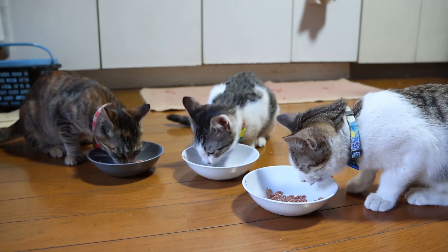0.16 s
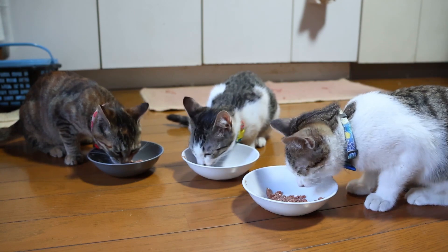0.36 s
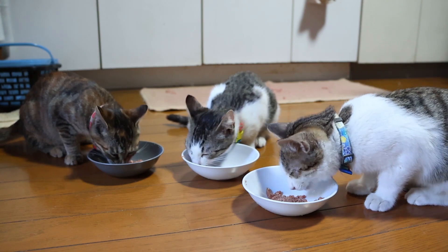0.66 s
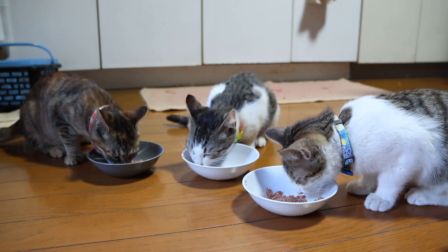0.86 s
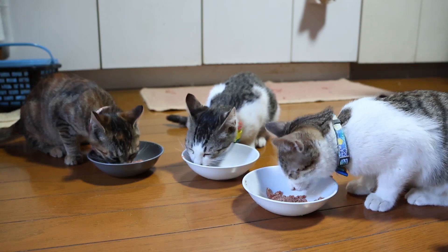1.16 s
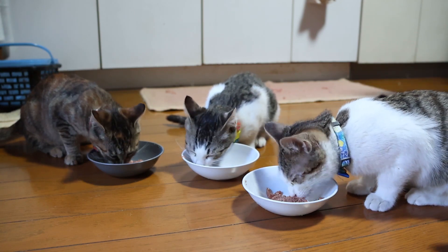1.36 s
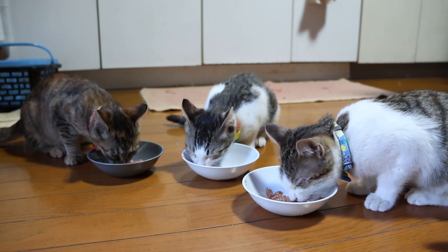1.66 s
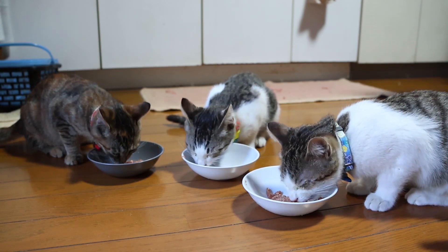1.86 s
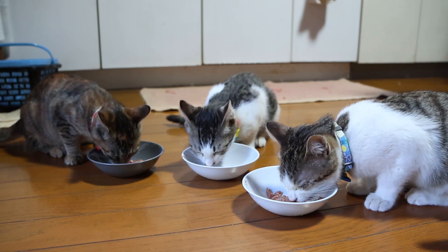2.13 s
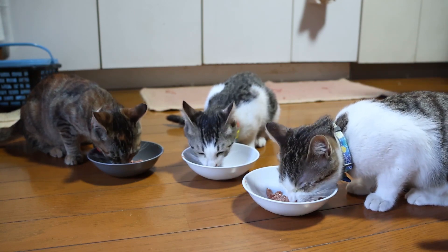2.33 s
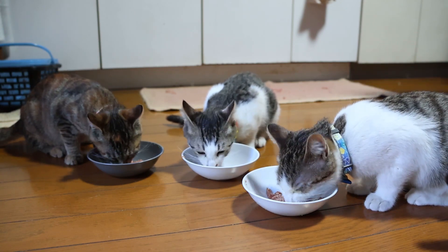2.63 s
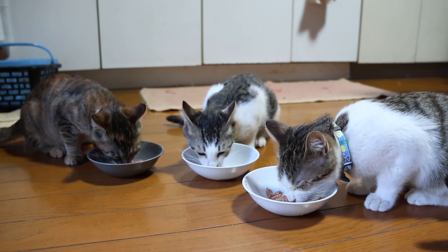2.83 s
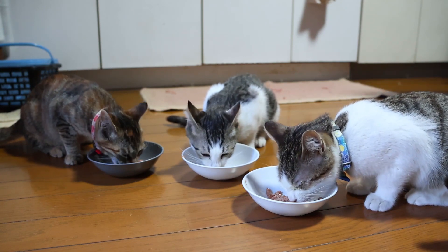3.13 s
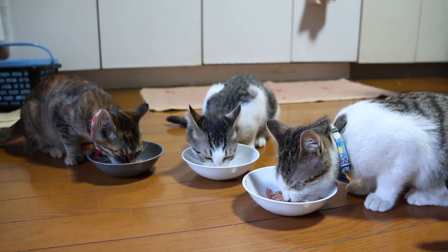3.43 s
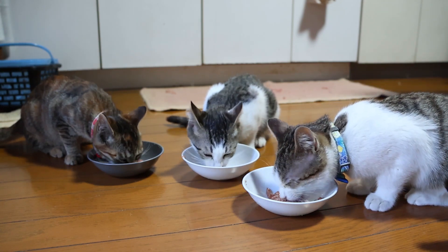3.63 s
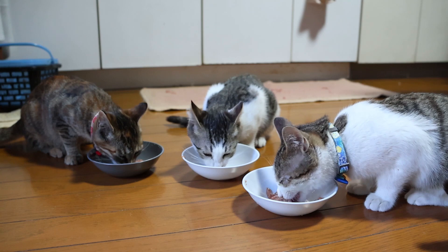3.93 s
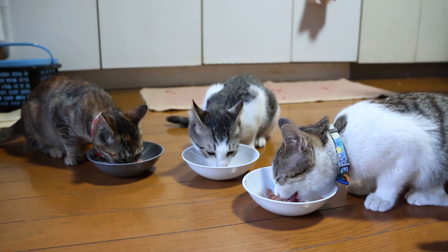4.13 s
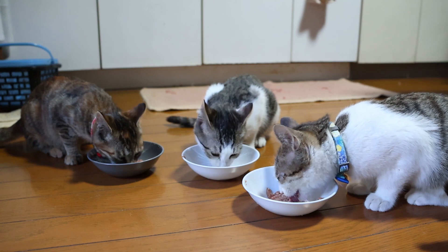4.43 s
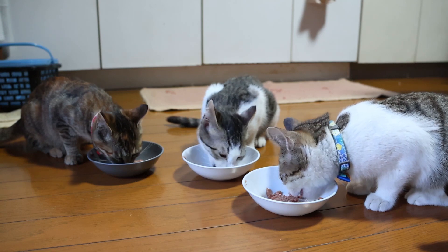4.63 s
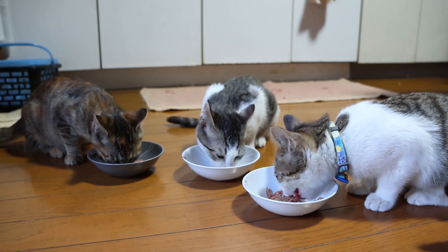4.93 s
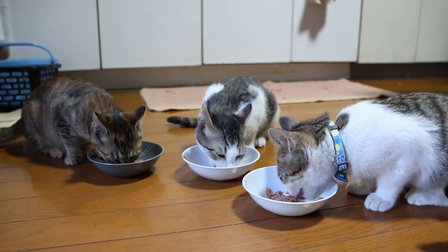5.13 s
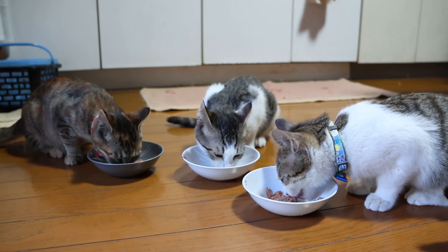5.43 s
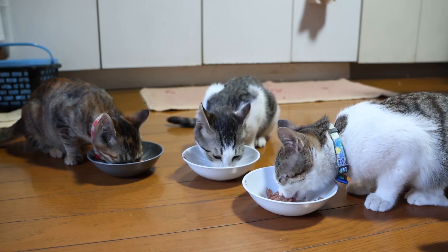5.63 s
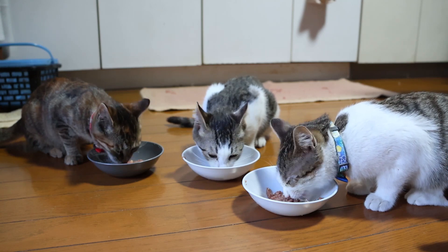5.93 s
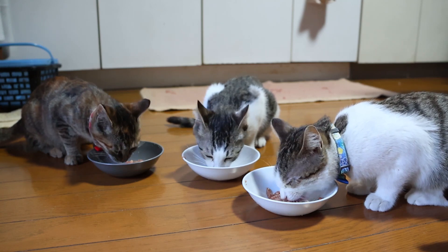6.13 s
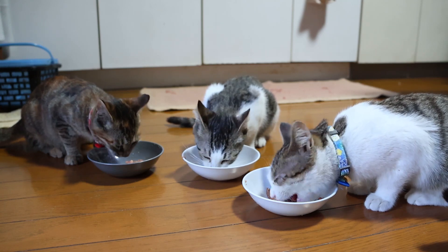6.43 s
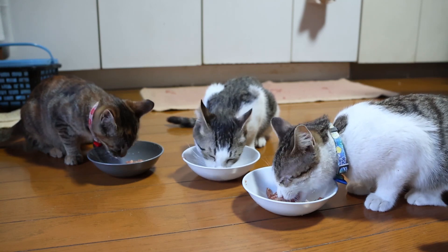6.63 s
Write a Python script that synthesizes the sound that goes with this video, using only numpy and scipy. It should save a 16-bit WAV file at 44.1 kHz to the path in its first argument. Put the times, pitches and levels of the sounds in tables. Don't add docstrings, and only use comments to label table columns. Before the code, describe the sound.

Three kittens lap and smack wet food from bowls in a small quiet kitchen, busy sticky clicks over a faint low motor hum.

```python
import sys
import numpy as np
from scipy import signal
from scipy.fft import rfft, irfft
from scipy.io import wavfile
from scipy.ndimage import uniform_filter1d

SR = 44100
rng = np.random.default_rng(int(sys.argv[2]) if len(sys.argv) > 2 else 0)


def undo_db(level):
    steps = np.asarray(level, float) / 20
    return 10 ** steps


def persist_wave(psi):
    counts = np.round(np.clip(psi, -1, 1) * 32767).astype(np.int16)
    wavfile.write(sys.argv[1], SR, np.atleast_2d(counts).T)


N = 299439

# t/s, level/dB, f/Hz
GULPS = [(.1666, -44, 1090), (.2195, -43, 1260), (1.0153, -44.5, 1240), (1.1931, -43.5, 1060),
         (1.2878, -47, 850), (1.4604, -46.5, 1260), (1.7356, -49.5, 990), (1.8044, -46, 800),
         (1.9877, -40.5, 1090), (2.1564, -46, 874), (2.326, -34, 1210), (2.5679, -43.5, 1080),
         (3.1939, -49.5, 1100), (3.2729, -46, 910), (3.491, -42, 1060), (4.1449, -50, 930),
         (4.1907, -39, 1023), (4.5297, -39.5, 874), (4.8328, -44.5, 930), (4.8744, -47, 930),
         (6.02, -48, 1200), (6.0995, -46.5, 1090), (6.2041, -45.5, 995), (6.3054, -49, 800),
         (6.413, -40.5, 1270)]
# t/s, level/dB, f/Hz
SLURPS = [(.005, -30, 1636), (.1002, -46, 1560), (.193, -36.5, 1510), (.844, -39.5, 1690),
          (1.7288, -46, 1780), (1.8807, -42.5, 1550), (2.2556, -44, 1640), (2.3895, -46, 1690),
          (2.8369, -41, 1490), (3.6854, -43.5, 1700), (4.1398, -34.5, 1820), (4.395, -36.5, 1730),
          (4.7889, -43, 1550), (4.8786, -46.5, 1430), (4.9216, -40, 1600), (5.1425, -41, 1490),
          (5.1755, -42, 1660), (5.3563, -45, 1780), (5.3845, -35, 1800), (5.5193, -38, 1460),
          (5.612, -42, 1530), (5.7404, -40, 1460), (6.1525, -42.5, 1510), (6.1837, -39.5, 1730),
          (6.3867, -43, 1520), (6.5862, -45.5, 1520)]
# t/s, level/dB, f/Hz
SLAPS = [(.3824, -33, 1480), (.5739, -23.5, 1640), (.5745, -43, 1830), (.495, -39, 1580),
         (1.148, -27.5, 1620), (1.5068, -43, 1530), (1.6078, -28.5, 1670), (1.6988, -43, 1540),
         (1.948, -42, 1730), (2.0932, -38, 1590), (2.335, -24.5, 1366), (3.283, -35.5, 1640),
         (3.4198, -32, 1350), (3.5271, -36.5, 1940), (3.6593, -43, 1610), (4.0578, -46, 1490),
         (4.2884, -32.5, 1860), (4.3388, -23.5, 1680), (4.59, -36, 1580), (4.9975, -26.5, 1580),
         (5.1034, -42, 1600), (5.2477, -42, 1360), (5.5016, -32, 1640), (5.6505, -35.5, 1770),
         (5.9832, -38, 1440), (6.4288, -33.5, 1530), (6.4765, -40.5, 1350), (6.477, -50, 645),
         (6.7823, -39, 850), (6.7823, -26.5, 1910)]
# t/s, level/dB, f/Hz
CLACKS = [(.001, -36, 2400), (.1885, -34, 2500), (.328, -59, 2660), (.8458, -35, 2470),
          (.9629, -39.5, 2080), (1.0128, -39.5, 2720), (1.3738, -44, 2520), (1.4015, -45, 2100),
          (1.6666, -30, 2320), (1.6988, -43, 3070), (2.0986, -51, 2870), (2.2833, -39, 2600),
          (2.4476, -47, 3350), (2.7476, -42.5, 3400), (3.9029, -39, 2170), (4.346, -32.5, 2560),
          (4.5929, -38, 2340), (4.8066, -48.5, 2800), (1.8688, -47, 4050), (6.4624, -46, 2580),
          (6.5052, -43, 2670), (6.616, -37.5, 3280), (6.7141, -32, 2360)]
# t/s, level/dB, f/Hz
CLUCKS = [(1.1505, -27.5, 2370), (1.9932, -36, 2160), (2.0555, -33, 2830), (2.1772, -35, 2100),
          (2.5835, -35, 2650), (2.6156, -29.5, 2270), (2.6783, -44, 3460), (2.8478, -25.5, 2670),
          (3.0486, -41, 2980), (3.4241, -36.5, 2970), (3.7396, -44.5, 3400), (3.7889, -43.5, 2260),
          (4.3999, -31.5, 2630), (4.4634, -40, 2530), (4.5086, -28.5, 2500), (5.1086, -34.5, 2640),
          (5.2057, -42, 2540), (5.234, -41.5, 2980), (5.3435, -37, 2780), (5.7724, -40.5, 2700),
          (5.9927, -32.5, 2750), (6.192, -36.5, 2740), (6.2646, -39.5, 2590)]
# t/s, level/dB, f/Hz
SMACKS = [(.2893, -45, 6680), (.3273, -53.5, 4620), (.8852, -47, 4660), (1.0125, -50.5, 6500),
          (1.176, -35.5, 5830), (1.2479, -50, 6350), (1.5339, -51, 6200), (1.7361, -54, 5100),
          (1.7625, -46, 5490), (1.983, -47, 8150), (2.0316, -42, 8060), (2.373, -56, 5370),
          (2.5849, -38.5, 6430), (3.3887, -54, 8000), (3.4248, -45, 5920), (3.4652, -43.5, 7300),
          (3.098, -56, 7100), (3.555, -65, 6200), (4.9632, -55.5, 11900), (4.1148, -35.5, 5020),
          (4.1154, -33.5, 7530), (4.2296, -48.5, 6900), (4.2977, -47.5, 5180), (5.2708, -48.5, 6530),
          (5.4753, -56, 4100), (5.5585, -41, 5020), (5.9599, -52.5, 4400), (6.5231, -53, 4170),
          (6.7755, -51, 4970)]
# t/s, level/dB, f/Hz
TICKS = [(.546, -40.5, 7250), (.566, -46, 6700), (.9282, -42, 4300), (1.655, -45, 4240),
         (2.1239, -35, 6680), (2.4372, -50.5, 5300), (2.7472, -49.5, 7590), (2.845, -40.5, 4350),
         (2.8872, -44, 6500), (3.3382, -48.5, 6470), (3.6194, -37, 7100), (3.7748, -49, 3740),
         (3.8911, -43.5, 4700), (4.0164, -49, 5420), (4.0697, -40, 7100), (4.4585, -42, 6660),
         (4.4968, -42, 8300), (4.5642, -32.5, 6740), (4.9228, -49, 6100), (5.2227, -48, 7600),
         (5.2539, -44, 7840), (5.6502, -47, 5400), (5.8183, -40.5, 7800), (6.0186, -45, 7240),
         (6.0861, -39.5, 4200), (6.0877, -41.5, 7750), (6.3334, -46.5, 7260), (6.6156, -40.5, 6400),
         (6.6779, -45, 5850), (6.733, -35.5, 5560)]
# t/s, level/dB, f/Hz
SNAPS = [(.0587, -32, 10200), (.288, -40.5, 10400), (.4908, -43, 9570), (.92, -35, 14200),
         (1.0689, -46, 10420), (1.868, -26, 10500), (2.3986, -40, 14140), (2.6626, -40.5, 9000),
         (2.836, -38.5, 8900), (2.847, -38, 9300), (3.3362, -40, 14340), (3.889, -39, 9400),
         (4.1047, -32, 14400), (4.419, -34, 14060), (4.564, -30, 9050), (5.1752, -44, 10480),
         (5.389, -40.5, 9300), (5.4707, -27.5, 11100), (5.6019, -32, 14400), (5.7237, -33.5, 10600),
         (5.818, -38, 11000), (6.3955, -41.5, 10000)]
# t/s, level/dB, f/Hz
SPITS = [(1.3928, -42, 8800), (1.533, -40, 13700), (1.7041, -46.5, 9800), (2.4301, -41.5, 9100),
         (2.6071, -45, 11880), (3.1123, -48.5, 10200), (3.2315, -41, 9550), (3.5918, -34.5, 11800),
         (4.0472, -42, 14130), (4.8414, -45, 12900), (5.1282, -39, 12900), (5.6812, -44, 11830),
         (6.1471, -43, 11990), (6.3363, -45, 14350), (6.629, -41, 12100), (6.6415, -41, 11900),
         (1.3695, -46, 7300), (1.5733, -50, 8900), (1.6015, -47, 8300), (2.2301, -53, 6900),
         (2.2781, -46, 8480), (2.3392, -46, 8340), (1.6845, -48, 14440)]
# t/s, level/dB, f/Hz
SQUEAKS = [(.4953, -42.5, 1267), (.5095, -44, 1240), (.528, -53, 1250), (.727, -33.5, 8140),
           (1.7641, -41, 1856), (2.6987, -33.5, 1677), (3.1513, -41.5, 2650), (3.6227, -33.5, 4260),
           (3.6799, -28.5, 4690), (4.498, -38, 1850), (4.923, -36, 3040), (5.0801, -39.5, 7600),
           (5.7875, -33.5, 1635)]
# t/s, level/dB, f/Hz
LAPS = [(0.1147, -50, 1580), (0.2913, -48, 2816), (0.3312, -51.0, 2661), (0.5328, -46, 1240),
        (0.7523, -49, 2723), (0.8042, -51, 820), (1.4577, -50, 1710), (1.5365, -55, 1019),
        (1.6034, -51, 1044), (1.7321, -54, 1869), (1.767, -41, 1855), (1.8059, -62, 850),
        (1.8717, -53, 1040), (2.0962, -38, 2900), (2.2349, -49, 3300), (2.2579, -48, 2514),
        (2.3487, -44.5, 2320), (2.4993, -51, 671), (2.5801, -46, 1630), (2.7288, -50, 854),
        (2.9313, -55, 845), (3.2486, -50, 950), (3.3933, -48, 1080), (3.528, -44, 1680),
        (3.8014, -50, 3480), (4.0877, -59, 870), (4.1426, -40.5, 1830), (4.4988, -36.5, 1757),
        (4.8939, -46.1, 1420), (4.9478, -52, 1020), (5.0565, -53, 790), (5.2072, -51, 870),
        (5.3558, -45, 1720), (5.4766, -47, 2758), (5.5334, -48, 2408), (5.5973, -47, 640),
        (5.6412, -44.5, 3480), (5.8587, -51, 790), (6.155, -47, 3150), (6.1999, -48, 670),
        (6.2209, -46.5, 1390), (6.2229, -54, 670), (6.2548, -49.5, 655), (6.2957, -50.1, 2421),
        (6.3216, -52, 2370), (6.3366, -49, 2459), (6.3985, -47, 2832), (6.6509, -46, 810),
        (6.7367, -45, 840)]
# t/s, level/dB, f/Hz
PECKS = [(0.007, -54, 4230), (0.0908, -53.9, 6976), (0.1117, -55, 13545), (0.3302, -56, 13176),
         (0.3851, -55.5, 6712), (0.4131, -61, 11617), (0.7872, -58.8, 13797), (0.8461, -53.0, 5840),
         (1.2911, -53.8, 5600), (1.6363, -51.3, 4700), (1.6582, -51.5, 8160), (2.3956, -57, 13133),
         (2.4824, -59, 5770), (2.6669, -55.7, 5784), (3.4013, -53.8, 7799), (3.4023, -54, 5420),
         (4.7422, -58, 3999), (5.2201, -53, 4600), (5.3079, -57, 12781), (5.3209, -58, 12900),
         (5.3239, -57, 5505), (5.3389, -53.0, 5300), (5.3508, -55, 7900), (5.5314, -57, 6000),
         (5.6731, -58, 3700), (5.724, -51.7, 7000), (5.9555, -54, 8000), (6.15, -52, 5500),
         (6.3995, -56, 6650), (6.4024, -54.5, 3840), (6.4853, -54, 4073), (6.58, -58, 11861),
         (6.7896, -37.5, 5070)]
# t/s, level/dB, f/Hz
CRACKS = [(0.0573, -35, 10100), (0.2882, -33, 6870), (0.5447, -30, 6490), (0.726, -30, 7950),
          (0.8814, -33, 4840), (1.1738, -37, 6050), (1.7614, -36, 5500), (1.866, -32, 9740),
          (2.124, -38, 7250), (2.584, -28, 6220), (3.4236, -29, 5760), (3.5902, -39, 11900),
          (3.622, -30, 4160), (3.6765, -28, 4730), (4.1139, -20.5, 5300), (4.564, -33, 6340),
          (5.0789, -35, 7610), (5.4695, -29, 11900), (5.5573, -25, 5040), (5.8172, -33, 6900),
          (6.0855, -20, 4060), (6.333, -36, 7390), (6.616, -34, 6860), (6.733, -37, 6130)]
# t/s, level/dB, f/Hz
KNOCKS = [(1.2883, -30, 900), (2.484, -36, 1500), (1.289, -43, 470), (5.9, -34, 340), (1.5, -34, 1100),
          (5.2, -30, 1400), (2.907, -41, 900), (4.1449, -32, 1000), (6.318, -35, 990),
          (6.4762, -27.5, 1340), (6.7823, -25, 1900)]
# t/s (delay), mid level/dB, side level/dB
ARRIVALS = [
    (0.0, -6.5, -25),
    (.0066, 0.5, -10),
    (0.021, 0, -5.5),
]
# f/Hz, level/dB
HOLLOWS = [(1058, -2), (1138, 3.5), (1230, -3), (1371, -3.5), (1411, -3), (1455, -11), (1504, -10),
           (1580, 2), (1664, 0), (1815, -12), (1880, -6), (2220, -31), (2265, 2.5), (2450, 3.5), (2550, 0),
           (2650, -8), (2810, -2), (3325, 4.5), (4120, -2), (5250, -10), (6130, 0.5), (6870, 0)]
# f/Hz, T60/s
ROOM_T60 = [(500, 0.27), (2000, 0.22), (6000, 0.16), (14000, 0.14)]
# f/Hz, side over mid level/dB
ROOM_SIDE = [(500, -18), (1200, -17.5), (2200, -17.5), (4500, -6), (8000, -9.5), (13000, -1.5)]
# t/s, level/dB
MOTOR = [
    (0.0, -60),
    (2.89, -55.5),
    (4.88, -73.5),
    (6.79, -61),
]
# f/Hz, level/dB
ORDERS_UP = [(283, -64), (377, -66), (471, -67.5), (625, -65.5)]
# f/Hz, level/dB (per Hz)
AIR = [(24, -51), (40, -30), (75, -8.5), (133, -9.5), (188, -2), (241, -6), (334, -10), (564, -9.5),
       (863, -14), (1650, -16), (2460, -16), (3160, -24), (7030, -30), (12800, -39.5), (15600, -39)]
# f/Hz, side over mid level/dB
AIR_SIDE = [(40, -4), (120, -16.5), (300, -14), (1000, -13.5), (3000, -5), (8000, 0), (14000, 4)]
# f/Hz, left over right level/dB
LEAN = [(300, 0.0), (4000, -.5), (8000, 0), (14000, -0.5)]

GULP_CYCLES, SLURP_CYCLES, SLAP_CYCLES, CLACK_CYCLES, CLUCK_CYCLES = 6.13, 7.24, 3.82, 5.38, 3.9
SMACK_CYCLES, TICK_CYCLES, SNAP_CYCLES, SPIT_CYCLES = 6.7, 3.2, 2.58, 6.0
SQUEAK_CYCLES, LAP_CYCLES, PECK_CYCLES, KNOCK_CYCLES = 10.02, 5.71, 6.6, 10
SQUISH_DB, FIZZ_DB, CRACK_DB = -68.5, -75, -5.5
CEILING_S, HOLLOW_T60_S = .0066, 0.12
EARLY_SHARE, EVENNESS = 0.16, 0.7
MOTOR_HZ, OCTAVE_DB = 94.77, -52
WHINE_HZ, WHINE_DB, WHINE_T60_S = 559.7, -61.5, 0.3
AIR_DB = -47.5
LEAD = SR // 10


def pops(rows, cycles, gain_db, glide, crack_db, dribble_db):
    out = np.zeros(N + SR)
    t = np.arange(int(SR * .03)) / SR
    chance = rng.random((len(rows), 4, 3))
    for (s, db, hz), luck in zip(rows, chance):
        dribbles = luck * [.05, .26, -14] + [.004, .9, dribble_db]
        delays, ratios, weaker_db = np.vstack([[0, 1, 0], dribbles]).T
        pitches = np.minimum(hz * ratios, 16000)
        sizes = undo_db(db + gain_db + weaker_db)
        for delay, pitch, size in zip(delays, pitches, sizes):
            pace = pitch / np.clip(cycles, .5, 40) ** 1.3 * 7.5
            age = t * pace
            climb = 1 + glide * (np.minimum(age, 8) / 6 - .5)
            phase = 2 * np.pi * pitch * t * climb
            pop = (age / 2) ** 2 * np.exp(2 - age) * np.sin(phase)
            pop += undo_db(crack_db) * np.sin(2 * phase) * np.exp(-t * pitch * 2.5)
            start = round((s + delay - 2 / pace - CEILING_S + .1) * SR)
            out[start:start + len(t)] += size * pop
    return out[:N + LEAD]


def ring(clicks, hz, t60):
    r = undo_db(-60 / (t60 * SR))
    w = 2 * np.pi * hz / SR
    return signal.lfilter([0, np.sin(w)], [1, -2 * r * np.cos(w), r * r], clicks + 1e-18)


def rms_one(x):
    return x / np.sqrt(np.mean(x ** 2) + 1e-20)


def bubbles(level_db, per_s, low_hz, high_hz):
    strengths = undo_db(4 * np.minimum(rng.exponential(1, N), 2.5))
    sizes = strengths * rng.choice([-1, 1], N)
    born = rng.random(N) < per_s / SR
    dealt = rng.integers(0, 14, N)
    pitches = np.geomspace(low_hz, high_hz, 14)
    grains = sum(ring(sizes * born * (dealt == k), hz, 20 / hz) for k, hz in enumerate(pitches))
    return np.pad(undo_db(level_db) * rms_one(grains), (LEAD, 0))


def near_mouths():
    large = dict(gain_db=-3.0, glide=0.032, crack_db=-14.0, dribble_db=-10.0)
    small = dict(gain_db=-0.22, glide=0.0085, crack_db=-7.5, dribble_db=-8.0)
    lips = dict(gain_db=7.0, glide=0.0082, crack_db=-38.0, dribble_db=-8.5)
    spit = dict(gain_db=-0.5, glide=0.02, crack_db=8.5, dribble_db=-15.0)
    mouths = pops(GULPS, GULP_CYCLES, **large)
    mouths += pops(SLURPS, SLURP_CYCLES, **large) + pops(SLAPS, SLAP_CYCLES, **large)
    mouths += pops(CLACKS, CLACK_CYCLES, **small) + pops(CLUCKS, CLUCK_CYCLES, **small)
    mouths += pops(SMACKS, SMACK_CYCLES, **lips) + pops(TICKS, TICK_CYCLES, **lips)
    mouths += pops(SNAPS, SNAP_CYCLES, **spit) + pops(SPITS, SPIT_CYCLES, **spit)
    mouths += pops(SQUEAKS, SQUEAK_CYCLES, gain_db=0.5, glide=0.011, crack_db=-9, dribble_db=-13.5)
    squish = bubbles(SQUISH_DB, 150, 1028, 4850)
    fizz = bubbles(FIZZ_DB, 90, 3560, 14000)
    return mouths + squish + fizz


def faint_mouths():
    laps = pops(LAPS, LAP_CYCLES, gain_db=-1.0, glide=0.015, crack_db=-13.0, dribble_db=-18.0)
    return laps + pops(PECKS, PECK_CYCLES, gain_db=7.5, glide=0.012, crack_db=-20.0, dribble_db=-14.0)


def knocks():
    out = np.zeros(N)
    cracks = [(s, db + CRACK_DB, hz) for s, db, hz in CRACKS]
    for s, db, hz in KNOCKS + cracks:
        click = (np.arange(800) == 0) * undo_db(db)
        knock = ring(click, hz, KNOCK_CYCLES / hz) + 0.91 * ring(click, 2.0 * hz, 3.5 / hz)
        start = round(s * SR - SR / hz / 2)
        out[start:start + 800] += knock[:N - start]
    return out


def at_hz(points, hz):
    known_hz, values = np.transpose(points)
    return np.interp(np.log(hz), np.log(known_hz), values)


def even_out(echoes):
    size = echoes.shape[1]
    power = np.abs(rfft(echoes[0])) ** 2 + 1e-9
    broad, fine = uniform_filter1d(power, size=500), uniform_filter1d(power, size=76)
    ripple = np.log(broad / fine) / 2 * EVENNESS
    folded = irfft(ripple, size) * np.repeat([2, 0], size // 2)
    folded[0] /= 2
    return irfft(rfft(echoes) * np.exp(rfft(folded)), size)


def kitchen(x, tail_db, hollow_db, build_s):
    size = int(.5 * SR)
    t = np.arange(size) / SR
    edges = 400 * 2 ** np.arange(0, 5.6, .5)
    white, tail = rng.standard_normal((2, size)), np.zeros((2, size))
    widths = undo_db([[0], [1]] * at_hz(ROOM_SIDE, edges * 2 ** 0.4))
    for low, high, width in zip(edges, edges[1:], widths.T):
        band = signal.sosfilt(signal.butter(2, [low, high], "band", fs=SR, output="sos"), white)
        decay = undo_db(-60 * t / at_hz(ROOM_T60, np.sqrt(low * high)))
        tail += band * decay * width[:, None]
    thicken = np.clip(EARLY_SHARE + (t / build_s) ** 2, 0, 1)
    tail *= undo_db(tail_db) * thicken
    for delay, mid_db, side_db in ARRIVALS:
        start = round(delay * SR)
        tail[0, start] += undo_db(mid_db)
        tail[1, start:start + 2] += undo_db(side_db) * np.array([-1, 1])
    tail = even_out(tail)
    click = np.arange(size) == 0
    for k, (hz, db) in enumerate(HOLLOWS):
        tail[0] += undo_db(db + hollow_db) * ring(click * (-1.) ** k, hz, HOLLOW_T60_S) * thicken
    return signal.fftconvolve(x[None], tail, axes=1)[:, LEAD:N + LEAD]


def blurred_tone(hz, t60):
    return rms_one(ring(rng.standard_normal(N), hz, t60))


def motor():
    t = np.arange(N) / SR
    s, db = np.transpose(MOTOR)
    fundamental = undo_db(np.interp(t, s, db)) * np.sqrt(2) * np.sin(2 * np.pi * MOTOR_HZ * t)
    octave = 0.79 * np.sqrt(2) * np.sin(4 * np.pi * MOTOR_HZ * t)
    octave += 0.59 * blurred_tone(2 * MOTOR_HZ, 0.11)
    whine = undo_db(WHINE_DB) * blurred_tone(WHINE_HZ, WHINE_T60_S)
    whine += sum(undo_db(db) * blurred_tone(hz, 0.3) for hz, db in ORDERS_UP)
    return fundamental + undo_db(OCTAVE_DB) * octave + whine


def colour(x, points):
    hz = np.maximum(np.fft.rfftfreq(x.shape[-1], 1 / SR), 1)
    return irfft(rfft(x) * undo_db(at_hz(points, hz)), x.shape[-1])


def air():
    noise = colour(rng.standard_normal((2, N)), AIR)
    mid, side = colour(noise, [(1500, 2.4), (5000, 0.5)])
    return undo_db(AIR_DB - 3.0) * np.array([mid, colour(side, AIR_SIDE)]) / np.std(mid)


def scene():
    near = kitchen(near_mouths(), tail_db=-12.0, hollow_db=-35, build_s=0.0041)
    faint = kitchen(faint_mouths(), tail_db=-14.0, hollow_db=-33, build_s=0.0048)
    mid, side = near + faint + air()
    mid = mid + knocks() + motor()
    return np.array([mid + side, mid - side])


def low_pass(x):
    return signal.sosfilt(signal.butter(12, 15770, fs=SR, output="sos"), x)


def record(dry):
    tilt = np.array(LEAN) * [1, .5]
    ports = np.array([colour(dry[0], tilt), colour(dry[1], tilt * [1, -1])])
    ports = signal.sosfilt(signal.butter(3, 48, "high", fs=SR, output="sos"), ports)
    ports = signal.sosfilt(signal.cheby2(16, 60, 16050, fs=SR, output="sos"), ports)
    return low_pass(ports)


dry = scene()
out = record(dry)
persist_wave(out)
```